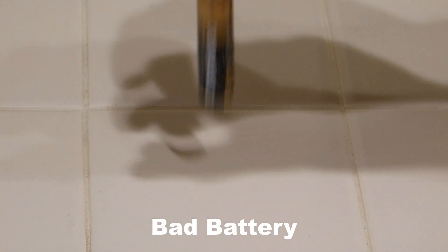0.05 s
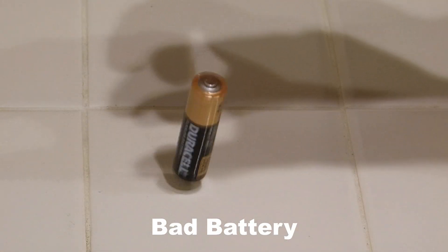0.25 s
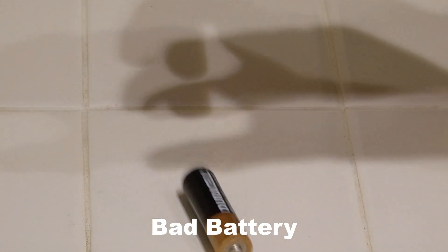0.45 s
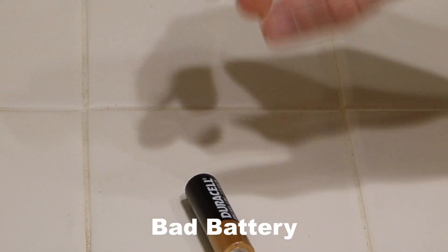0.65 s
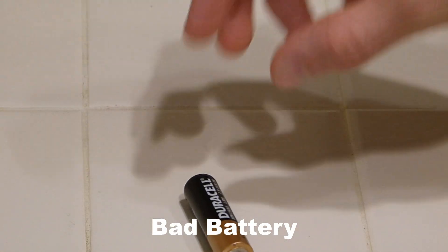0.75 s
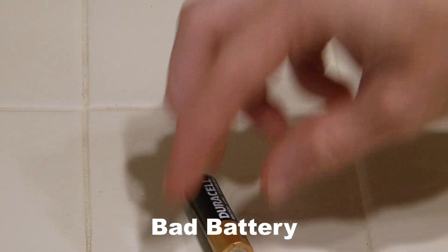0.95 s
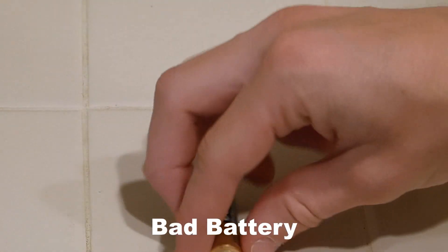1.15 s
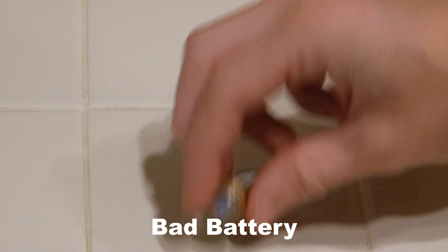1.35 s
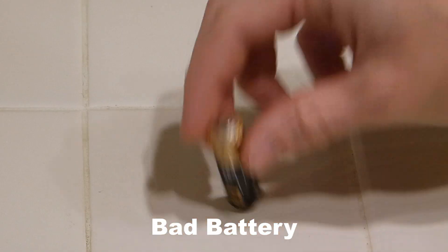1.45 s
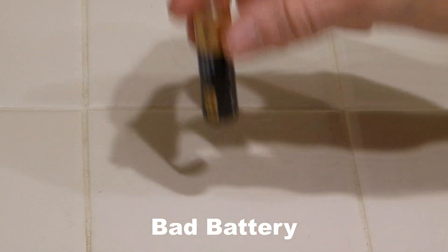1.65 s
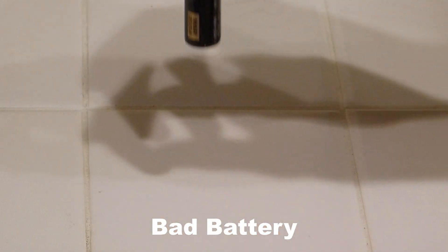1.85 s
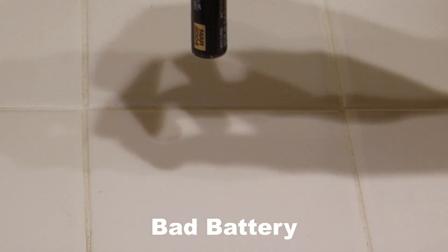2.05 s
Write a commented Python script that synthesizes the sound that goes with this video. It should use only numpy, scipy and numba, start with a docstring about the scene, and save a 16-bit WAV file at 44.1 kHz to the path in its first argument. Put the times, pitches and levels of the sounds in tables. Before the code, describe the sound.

Sharp clacks of a small battery bouncing on tile, then a faint rustle of a hand.

```python
"""Over the hum of a fan, a hand brushes softly and lets go of a small battery.
It lands end first on tile at 0.22 s, bounces with a dull knock and slaps onto its side at 0.53 s.
Each impact excites the modes of casing and tile, and the hard little room rings after it;
a gain control ducks on the loud blows and recovers. From about 1 s, hand and sleeve
rub about and pick the battery up with a faint tap."""
import sys
import numpy as np
from scipy import signal
from scipy.fft import rfft, irfft
from scipy.io import wavfile
from scipy.ndimage import uniform_filter1d, minimum_filter1d
from numba import njit

SR = 44100
rng = np.random.default_rng(int(sys.argv[2]) if len(sys.argv) > 2 else 0)


def output_pcm(signal):
    """Save a mono or channel-first signal as 16-bit PCM at the path in sys.argv[1].

    Samples are clipped to [-1, 1] before scaling.
    """
    pcm = np.clip(np.atleast_2d(signal).T, -1, 1) * 32767
    wavfile.write(sys.argv[1], SR, np.round(pcm).astype(np.int16))


N = 92610
T = np.arange(N) / SR
FREQS = np.fft.rfftfreq(N, 1 / SR)

# Battery on tile: t/s, clack level/dB, knock level/dB, ping level/dB, low cutoff/Hz, high cutoff/Hz
IMPACTS = [(0.223, 16.5, 6.5, 0, 500, 12000), (0.2248, 15, 18.5, 0, 150, 6000),
           (0.3505, 8.5, 9.5, -2, 300, 4580), (0.3525, 5.5, 16, -1, 150, 2982),
           (0.3628, -3.5, 12, -11.5, 150, 2483), (0.4946, -9.5, -2, -19.5, 200, 1500),
           (0.53, 25.5, 18.5, 21.5, 1150, 8200), (0.5329, 22.5, 18.5, 17, 1150, 4000),
           (0.5348, 26, 9, 7, 1200, 11000), (1.187, -38, -27, -52, 600, 4000)]
# Normal modes of the steel casing, the tile and the room: f/Hz, relative level/dB, T60/s
CASING_MODES = [(2921, -14, 0.0061), (4824, 3.5, 0.003), (6080, 0.5, 0.0017), (6670, 3, 0.0068),
                (7260, 0, 0.0066), (7755, -2.5, 0.012), (8700, -5.5, 0.0051), (10700, -12.5, 0.0039)]
TILE_MODES = [(368, -16, 0.0075), (500, -15, 0.0074), (737, -6, 0.03), (1082, -6.5, 0.019),
              (1250, -2, .012), (1760, 0, 0.0096), (2113, -5, 0.011), (2722, -8, 0.015)]
STANDING_WAVES = [(161, -12, 0.67), (197.3, -17, 0.96), (290.6, -18, 0.55), (336, -12, 0.23),
                  (550, -14, 0.17), (677, -17.5, .45), (770, -20.5, 0.26), (992, -17.5, 0.29),
                  (1037, -23, 0.16), (1186, -14, 0.26), (1273, -23.5, .45), (1404, -25.5, 0.44),
                  (1510, -23, .5), (1704, -25, .4), (1836, -31, 0.57), (2100, -31, 0.56)]
# Reverberation time: f/Hz, T60/s
REVERB_TIMES = [(200, 1.21), (800, 0.6537), (2000, 0.35), (4500, 0.4689), (8000, 0.3729), (12000, 0.3071)]
# Spectrum of the reflections: f/Hz, relative level/dB
REVERB_SPECTRUM = [(100, -3), (300, 0), (1000, -1.5), (2500, 2.5), (5000, -1), (9000, 1), (11000, -3),
                   (15000, -15)]
# Stereo width of the reflections: f/Hz, side level re mid/dB
REVERB_WIDTH = [(200, -2), (1000, -3), (4500, -8), (9000, -3.5)]
# Strokes of hand and sleeve: t/s, rise/s, hold/s, time to fall 20 dB/s, level/dB, low cutoff/Hz
STROKES = [(-0.05, 0.024, 0.046, 0.16, -50, 3220), (0.99, 0.025, 0.14, 0.084, -46, 3250),
           (1.178, 0.011, .015, 0.093, -49.5, 929), (1.691, 0.074, 0.021, 0.23, -54, 3510),
           (1.883, 0.17, 0.081, 0.27, -62, 3000)]
# Spectrum of the rubbing: f/Hz, relative level/dB
FRICTION_SPECTRUM = [(1000, -17.5), (1800, -3.5), (2700, -11.5), (4000, -6), (6500, -4), (9000, -8.5),
                     (12000, -21), (15000, -33)]
# Tones of the fan: f/Hz, level/dB
HUM_TONES = [(349.9, -71), (441.4, -57.5), (769.8, -66), (861.3, -69), (1007, -70)]
# Spectrum of the fan's airflow: f/Hz, relative level/dB
AIRFLOW_SPECTRUM = [(30, 3.5), (60, 3), (120, -15), (190, -2.5), (260, -6.5), (400, 0), (550, -1.5),
                    (800, 0), (1300, -5), (2200, -16.5), (4000, -17.5), (7300, -14.5), (11000, -25.5),
                    (15000, -35)]


def battery():
    """Impact excitation: each blow rings casing and tile; the softer the contact, the less treble."""
    casing, tile = unit_energy(ring(CASING_MODES)), unit_energy(ring(TILE_MODES))
    bending_hz, bending_t60_s = 3991, 0.012
    ping = ring([(bending_hz, 0, bending_t60_s)])  # the can bends most when it lands on its side
    out = np.zeros(N)
    for start, clack_db, knock_db, ping_db, low_hz, high_hz in IMPACTS:
        crack = undb(3.5) * unit_energy(rng.standard_normal(N) * decay(t60=0.012))
        clack = butterworth(casing + crack, 2000, "high", order=3)
        blow = undb(clack_db) * clack + undb(knock_db) * tile + undb(ping_db) * ping
        blow = butterworth(blow, low_hz, "high", order=3)  # end-on blows reach the bass
        blow = butterworth(blow, high_hz, "low", order=1)
        onset = int(start * SR)
        out[onset:] += blow[:N - onset]
    return butterworth(out, 10000, "low", order=3)


def room(source):
    """Reverberation: convolution with early echoes, a tail longest in the bass, and standing waves."""
    side_db = curve_at(REVERB_WIDTH, FREQS)
    spectrum = rfft(noise(REVERB_SPECTRUM, side_db))
    centres_hz = np.geomspace(100, 16000, 12)
    late = 0
    for hz, weights in zip(centres_hz, np.eye(len(centres_hz))):
        triangle = curve_at(list(zip(centres_hz, weights)), FREQS)
        band = irfft(spectrum * triangle, N)
        late = late + band * decay(curve_at(REVERB_TIMES, hz))
    early = noise(REVERB_SPECTRUM, side_db) * decay(t60=0.12)
    build_up = 1 - np.exp(-(T / 0.0059) ** 2)  # reflections gather over about 6 ms
    reflections = undb(-5) * unit_energy(early * build_up) + undb(-3.5) * unit_energy(late * build_up)
    response = reflections + undb(-7) * ring(STANDING_WAVES)
    return signal.fftconvolve(np.atleast_2d(source), response, axes=-1)[:, :N]


def hand():
    """Friction noise: skin and sleeve hiss as the hand lets go, reaches down, grips and lifts."""
    hiss = noise(FRICTION_SPECTRUM, side_db=-6.5)
    out = 0
    for start, rise, hold, fall, db, low_hz in STROKES:
        swell = np.clip((T - start) / rise, 0, 1)
        falling_s = np.maximum(T - start - rise - hold, 0)
        envelope = swell * undb(db - 20 * falling_s / fall)
        out = out + envelope * butterworth(hiss, low_hz, "high", order=3)
    return out


def fan():
    """Tonal and broadband noise: tones wavering in amplitude and phase over a steady rush of air."""
    waver_depth, waver_hz = 0.2, 90
    out = undb(-53.5) * noise(AIRFLOW_SPECTRUM, side_db=-2)
    for hz, db in HUM_TONES:
        waver = np.array([drift(waver_hz) + 1j * drift(waver_hz) for _ in range(2)])
        phasor = (1 + waver_depth * waver) * np.exp(2j * np.pi * hz * T)
        out = out + np.sqrt(2) * undb(db) * phasor.real
    return out


def ring(modes):
    """Modal superposition: damped sines of alternating sign, each with the energy of its level."""
    return sum((-1) ** k * undb(db) * unit_energy(np.sin(2 * np.pi * hz * T) * decay(t60))
               for k, (hz, db, t60) in enumerate(modes))


def decay(t60):
    """Exponential damping: 60 dB down after t60 seconds."""
    return np.exp(-np.log(1000) * np.minimum(T / t60, 20))


def noise(spectrum, side_db):
    """Spectral shaping: coloured mid-side stereo noise of rms 1."""
    mid, side = rfft(rng.standard_normal((2, N)))
    pair = mid + undb(side_db) * side * np.array([[1], [-1]])
    coloured = irfft(pair * undb(curve_at(spectrum, FREQS)), N)
    return unit_energy(coloured) * np.sqrt(N)


def drift(rate_hz):
    """Random modulation: Gaussian values joined by straight lines."""
    return np.interp(T * rate_hz, np.arange(N // 20), rng.standard_normal(N // 20))


def curve_at(points, hz):
    """Interpolation of (f/Hz, value) points on a log-frequency axis."""
    freqs, values = np.array(points, float).T
    return np.interp(np.log(np.maximum(hz, 1)), np.log(freqs), values)


def undb(db):
    """Amplitude ratio of a level in decibels."""
    return 10 ** (np.asarray(db) / 20)


def unit_energy(x):
    """Normalisation to a mean energy of 1 per channel."""
    return x / np.sqrt(np.sum(x ** 2) / (x.size / N))


def butterworth(x, hz, kind, order):
    """Maximally flat low- or high-pass filtering."""
    return signal.sosfilt(signal.butter(order, hz, kind, fs=SR, output="sos"), x)


def pan(x, left_db):
    """Level-difference panning: the left channel exceeds the right by left_db."""
    return x * undb(np.array([[left_db], [-left_db]]) / 2)


@njit
def gain_reduction(excess_db):
    """Envelope following: the reduction in dB rises fast, holds, then relaxes exponentially."""
    attack_s, hold_s, release_s = 0.00041, 0.093, 0.14
    attack_step = 1 - np.exp(-1 / (attack_s * SR))
    out = np.empty(len(excess_db))
    reduction, wait = 0., 0.
    for i in range(len(excess_db)):
        if excess_db[i] > reduction:
            reduction += (excess_db[i] - reduction) * attack_step
            wait = hold_s * SR
        elif wait > 0:
            wait -= 1
        else:
            reduction -= reduction / (release_s * SR)
        out[i] = reduction
    return out


def scene():
    """Superposition of the battery's direct sound, its reverberation, the hand and the fan."""
    blows = battery()
    return pan(blows + room(blows), left_db=-0.7) + pan(hand(), left_db=0.5) + pan(fan(), left_db=2.45)


def record(dry):
    """Limiting and filtering: the gain ducks on loud blows, bass thins, peaks clip, the top is cut."""
    threshold_db, look_ahead_s = -5.5, 0.00068
    low_hz, top_hz, clip_at, dc_offset = 120, 15900, 0.86, -0.003
    peak_db = 20 * np.log10(np.abs(dry).max(axis=0) + 1e-9)
    gain_db = -gain_reduction(peak_db - threshold_db)
    ahead = int(look_ahead_s * SR) + 1
    gain_db = uniform_filter1d(minimum_filter1d(gain_db, 2 * ahead), ahead)  # dips just before a blow
    thinned = butterworth(dry * undb(gain_db), low_hz, "high", order=2)
    clipped = np.clip(thinned, -clip_at, clip_at)
    steep_lowpass = signal.ellip(8, .2, 70, top_hz, fs=SR, output="sos")
    return signal.sosfilt(steep_lowpass, clipped) + dc_offset


dry = scene()
out = record(dry)
output_pcm(out)
```